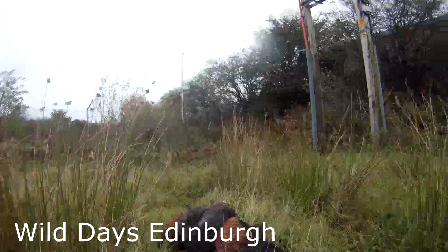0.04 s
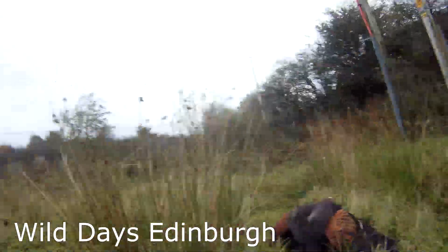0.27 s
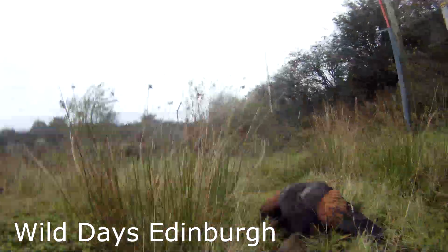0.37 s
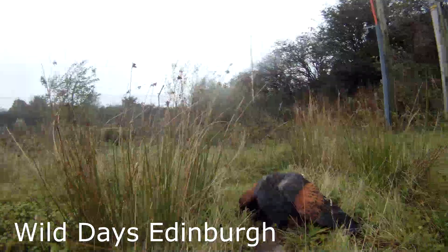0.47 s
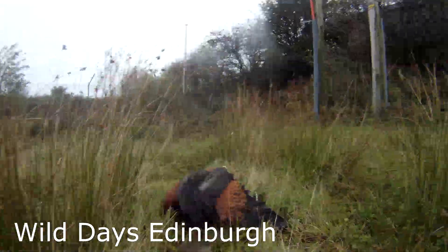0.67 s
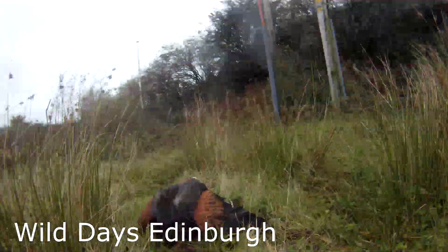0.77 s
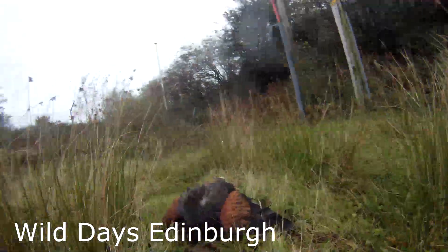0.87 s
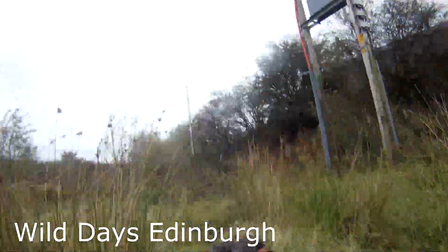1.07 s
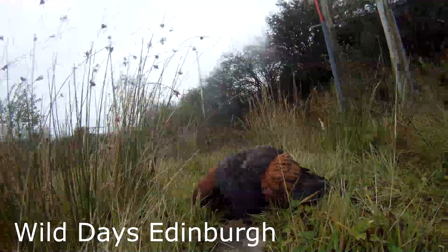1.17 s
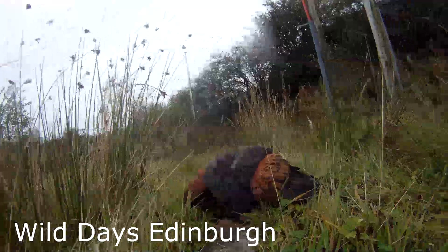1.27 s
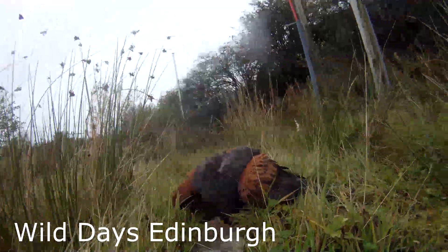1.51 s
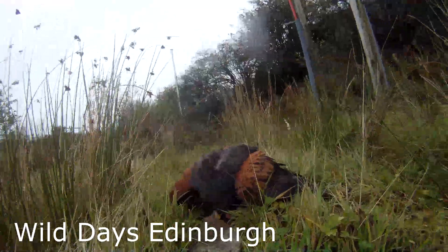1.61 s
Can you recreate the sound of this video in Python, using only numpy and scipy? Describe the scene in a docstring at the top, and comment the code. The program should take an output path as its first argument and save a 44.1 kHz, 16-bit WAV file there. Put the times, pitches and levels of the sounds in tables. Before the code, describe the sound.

A small camera being handled, heard through its own case in a grassy field: a click, gritty scuffing, a brief creak, then two sharp, slightly distorted snaps and fading rubs. Soft knocks and moving air thud on the microphone.

```python
"""A click and a scuff, then rubbing, a stick-slip creak and two hard snaps: a hand shifts its grip
on a small camera held low in rough grass. Friction, slips and snaps ring through the camera's case;
soft knocks and moving air thud on the microphone, which overloads on the snaps.
The camera's low sample rate adds a glassy treble."""
import sys
import numpy as np
from scipy import signal
from scipy.fft import rfft, irfft
from scipy.io import wavfile

SR = 44100
rng = np.random.default_rng(int(sys.argv[2]) if len(sys.argv) > 2 else 0)


def wav_record(signal):
    """Record a signal, one row per channel, as 16-bit PCM in the file named by sys.argv[1]."""
    frames = np.transpose(np.atleast_2d(signal))
    bounded = np.clip(frames, -1, 1)
    # unit amplitude maps onto the largest positive 16-bit level
    quanta = np.round(bounded * 32767).astype(np.int16)
    wavfile.write(sys.argv[1], SR, quanta)


N = 72765
TIME = np.arange(N) / SR
MIC_TOP_HZ = 5770


RUB_DB, RUB_TOP_HZ, GRIT_DB, GRIT_LOW_HZ = -2, 2560, -2, 2910
HISS_DB, HISS_AT_GRIT_DB, HISS_DB_PER_DB, HISS_LOW_HZ = -54.5, -43, 2.7, 4450
# Strokes along the case: t/s, relative rub level/dB, relative grit level/dB
STROKES = [(0, -77, -78.5), (.045, -79.5, -85), (.085, -67, -77), (.2, -72.5, -80), (.203, -41.5, -49),
           (.223, -28.5, -49), (.232, -46, -50), (.26, -47.5, -49), (.285, -50.5, -58),
           (.325, -54.5, -63.5), (.36, -45, -49.5), (.395, -44, -42.5), (.417, -35, -42),
           (.452, -52.5, -58), (.485, -48, -49.5), (.525, -56, -59), (.537, -49, -51.5), (.61, -46.5, -50),
           (.67, -49, -55), (.745, -48.5, -56.5), (.8, -50, -54), (.835, -48, -44.5), (.862, -46, -43),
           (.893, -39.5, -43), (.905, -54.5, -61), (.918, -48.5, -54), (.94, -51, -55), (.956, -60, -78),
           (1.008, -55, -55.5), (1.037, -72.5, -79.5), (1.065, -46.5, -64), (1.085, -51.5, -58.5),
           (1.125, -42, -59), (1.17, -54, -61.5), (1.187, -70.5, -77), (1.2, -61, -70), (1.235, -52.5, -64),
           (1.265, -44.5, -55), (1.312, -57, -69), (1.333, -50.5, -63), (1.352, -61.5, -64),
           (1.4, -55.5, -63.5), (1.47, -62, -71), (1.53, -53.5, -64), (1.545, -69.5, -74.5),
           (1.65, -72, -79)]

def rubbing():
    """Friction through the case gives a dull rub and a gritty brush; the fastest strokes add hiss."""
    rub_db, grit_db = envelopes(STROKES)
    hiss_db = HISS_DB + HISS_DB_PER_DB * (grit_db - HISS_AT_GRIT_DB)
    rub = unit_rms(case(cut(friction(), RUB_TOP_HZ, order=4)))
    grit = unit_rms(cut(case(friction()), GRIT_LOW_HZ, "high", order=3))
    treble = cut(rng.standard_normal(N), HISS_LOW_HZ, "high", order=4)
    hiss = unit_rms(cut(treble, MIC_TOP_HZ, order=4))
    return from_db(RUB_DB + rub_db) * rub + from_db(GRIT_DB + grit_db) * grit + from_db(hiss_db) * hiss


SNAP_CASE_DB, SNAP_RING_DB, CRUNCH_DB, CRUNCH_DECAY_S = 10.5, 14.5, -5.5, 0.0015
# Case snapping under the grip: t/s, relative level/dB, low-pass f/Hz
CASE_SNAPS = [(0.1494, -37, 1100), (0.9847, -12, 1520), (0.9926, -29.5, 3000), (1.0003, -12, 5300)]

def snaps():
    """A hard release with a brief crunch sets the case and one stiff panel ringing."""
    out, hit = np.zeros(N), impulse()
    ring = from_db(SNAP_RING_DB) * panel()
    decay = np.exp(-TIME[:len(hit)] / CRUNCH_DECAY_S)
    for start_s, db, top_hz in CASE_SNAPS:
        crunch = from_db(CRUNCH_DB) * rng.standard_normal(len(hit)) * decay
        body = from_db(SNAP_CASE_DB) * unit_energy(case(cut(hit + crunch, top_hz)))
        add(out, start_s, from_db(db) * (body + ring))
    return out


TICK_CASE_DB, TICK_RING_DB, REBOUND_S, REBOUND_DB = 14.5, 4, 0.002268, -10
# Slips of the grip: t/s, relative level/dB, low-pass f/Hz
SLIPS = [(0.202, -40, 3920), (0.2234, -33.5, 3880), (.4152, -44, 2500), (.485, -33, 1970),
         (.6068, -39, 2500), (0.7528, -29, 2450), (0.7603, -29, 2560), (0.77, -29.5, 2590),
         (0.7767, -29.5, 2540), (.781, -33, 2500), (0.786, -28.5, 2470), (0.8022, -32.5, 2590),
         (0.8067, -30.5, 2580), (0.8171, -29, 2540), (.8256, -28, 2510), (.8436, -25.5, 2950),
         (0.8598, -24.5, 4850), (0.8736, -46, 5000), (1.1212, -40.5, 2430), (1.1294, -34.5, 1790),
         (1.3262, -40, 1460), (1.3315, -40, 1440), (1.5471, -36, 2220), (1.5797, -41, 2340)]

def ticks():
    """Each slip strikes the case and its panel and rebounds once; a quick run of them is a creak."""
    out = np.zeros(N)
    ring = from_db(TICK_RING_DB) * panel()
    for start_s, db, top_hz in SLIPS:
        body = from_db(TICK_CASE_DB) * unit_energy(case(cut(impulse(), top_hz, order=2)))
        tick = from_db(db) * (body + ring)
        add(out, start_s, tick)
        add(out, start_s + REBOUND_S * rng.uniform(0.93, 1.0), from_db(REBOUND_DB) * tick)
    return out


# Soft knocks on the body: centre t/s, peak level/dB, f/Hz
BODY_KNOCKS = [(.2048, -33, 185), (0.2211, -33, 108), (0.312, -49, 97), (0.4242, -40.5, 65),
               (0.4884, -27, 115), (0.4883, -40.5, 231), (.491, -41, 50), (0.62, -40, 60),
               (.648, -35.5, 139), (0.7123, -43, 178), (0.8621, -43, 151), (.909, -42.5, 114),
               (1.002, -30, 300), (1.329, -45.5, 260), (1.581, -46.5, 245)]

def knocks():
    """Each knock is one push and pull of air on the microphone."""
    out = np.zeros(N)
    for centre_s, db, hz in BODY_KNOCKS:
        phase = 2 * np.pi * hz * (TIME - centre_s)
        out -= from_db(db) * phase * np.exp((1 - phase ** 2) / 2)
    return out


# Hollow chafe of the later, slower strokes: t/s, level/dB
CHAFE_LEVELS = [(0, -84.5), (.7, -75), (.79, -47.5), (.85, -57), (.9, -75), (1.17, -79.5), (1.28, -56),
                (1.33, -54), (1.37, -63), (1.5, -66.5), (1.65, -74)]

def chafing():
    """Friction that stirs only the case's resonance near 1 kHz."""
    chafe_db, = envelopes(CHAFE_LEVELS)
    return from_db(chafe_db) * unit_rms(resonate(friction(), hz=1015, width_hz=590))


RUMBLE_LOW_HZ, RUMBLE_TOP_HZ = 28.8, 109
# Moving air and hand tremor: t/s, rumble level/dB, boom level/dB
AIR_LEVELS = [(0, -75.5, -89), (.11, -72.5, -88.5), (.14, -58.5, -104), (.195, -68, -82),
              (.225, -46.5, -59), (.27, -62.5, -87), (.32, -58, -91), (.38, -52, -73.5), (.46, -62, -67),
              (.54, -51.5, -70), (.58, -66, -73), (.62, -45.5, -55), (.69, -56.5, -80), (.78, -58, -54.5),
              (.86, -59, -58.5), (.92, -56, -69), (.97, -64, -82), (1.04, -67, -76), (1.1, -56, -54.5),
              (1.15, -55, -59), (1.18, -64, -78), (1.26, -52.5, -60.5), (1.33, -65.5, -72),
              (1.38, -67, -68.5), (1.5, -78, -71.5), (1.55, -60, -64), (1.65, -77.5, -83)]

def air():
    """Lumpy rumble on the microphone port and a hollow boom from the held body."""
    rumble_db, boom_db = envelopes(AIR_LEVELS)
    white = rng.standard_normal((2, 2 * N))  # first half lets the filters settle
    rumble = cut(cut(white[0], RUMBLE_TOP_HZ, order=3), RUMBLE_LOW_HZ, "high")[N:]
    boom = resonate(white[1], hz=242, width_hz=144)[N:]
    return from_db(rumble_db) * unit_rms(rumble) + from_db(boom_db) * unit_rms(boom)


def friction(catches_per_s=20000, spread_db=1.55, flutter_db=1.83, flutter_top_hz=79):
    """Dense tiny catches of uneven size, fluttering in strength."""
    sizes = from_db(spread_db * np.minimum(rng.exponential(1, N), 5))
    signs = rng.choice([-1, 1], N)
    flutter = unit_rms(cut(rng.standard_normal(N), flutter_top_hz, order=2))
    caught = rng.random(N) < catches_per_s / SR
    return sizes * signs * caught * from_db(flutter_db * flutter)


# Response of case and microphone port: f/Hz, level/dB
CASE_RESPONSE = [(100, -18.5), (290, -17.5), (580, -22.5), (920, -8), (1450, -8.5), (1850, -3), (2170, 3.5),
                 (2700, -13), (3050, -14.5), (3550, -2.5), (3950, -9.5), (4400, -24), (5250, -13),
                 (6000, -27), (7000, -33.5)]

def case(x, taps=2048):
    """A contact rings through the case's resonances, as a minimum-phase filter."""
    hz, db = np.transpose(CASE_RESPONSE)
    bin_hz = np.fft.rfftfreq(taps, 1 / SR)
    gain = from_db(np.interp(np.log(bin_hz + 1), np.log(hz), db))
    cepstrum = irfft(np.log(gain))
    causal = np.r_[cepstrum[0], 2 * cepstrum[1:taps // 2]]
    ring = irfft(np.exp(rfft(causal, taps)))
    return signal.fftconvolve(x, ring)[:len(x)]


# Modes of a stiff panel: f/Hz, width/Hz, relative level/dB
PANEL_MODES = [(1402, 260, -17.5), (1972, 343, 0)]

def panel():
    """The struck panel swells quickly and rings for a few cycles, its modes opposite in sign."""
    modes = [(-1) ** k * from_db(db) * resonate(impulse(), hz, width_hz)
             for k, (hz, width_hz, db) in enumerate(PANEL_MODES)]
    return unit_energy(sum(modes))


def from_db(db):
    """Decibels to gain."""
    return 10 ** (np.asarray(db) / 20)


def unit_rms(x):
    """Scale to rms 1."""
    return x / np.sqrt(np.mean(x ** 2) + 1e-20)


def unit_energy(x):
    """Scale to energy 1."""
    return x / np.sqrt(np.sum(x ** 2))


def envelopes(rows):
    """Each level column, interpolated to every sample."""
    times_s, *columns = np.transpose(rows)
    return [np.interp(TIME, times_s, column) for column in columns]


def cut(x, hz, kind="low", order=1):
    """Butterworth low- or high-pass."""
    return signal.sosfilt(signal.butter(order, hz, kind, fs=SR, output="sos"), x)


def resonate(x, hz, width_hz):
    """Band-pass resonance with peak gain 1."""
    top_hz = (width_hz + np.sqrt(width_hz ** 2 + 4 * hz ** 2)) / 2
    band = signal.butter(2, [top_hz - width_hz, top_hz], "band", fs=SR, output="sos")
    return signal.sosfilt(band, x + 1e-18)


def impulse():
    """One unit sample, then silence."""
    return signal.unit_impulse(2048)


def add(out, start_s, sound):
    """Mix a short sound in at start_s."""
    i = int(start_s * SR)
    out[i:i + len(sound)] += sound[:N - i]


def scene():
    """All sources at the one microphone."""
    return (rubbing() + chafing() + ticks() + snaps() + knocks() + air())[None]


CLIP_LEVEL, SAMPLE_HZ, OUTPUT_TOP_HZ = 0.087, 12000, 15400

def record(dry):
    """The input clips the hardest peaks; a slow sample-and-hold mirrors the mids into a glassy treble."""
    hz = np.fft.rfftfreq(N, 1 / SR)
    clipped = np.clip(dry, -CLIP_LEVEL, CLIP_LEVEL)
    narrow = irfft(rfft(clipped) / np.sqrt(1 + (hz / MIC_TOP_HZ) ** 20), N)
    mirrored = narrow * (1 + 2 * np.cos(2 * np.pi * SAMPLE_HZ * TIME))
    hold_droop = np.sinc(hz / SAMPLE_HZ)
    low_pass = 1 / (1 + (hz / OUTPUT_TOP_HZ) ** 80)
    return irfft(rfft(mirrored) * hold_droop * low_pass, N)


dry = scene()
out = record(dry)
wav_record(out)
```